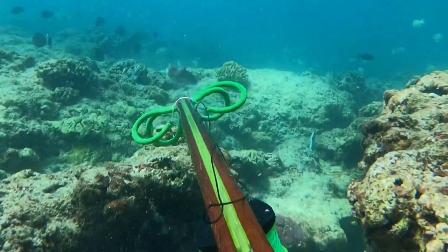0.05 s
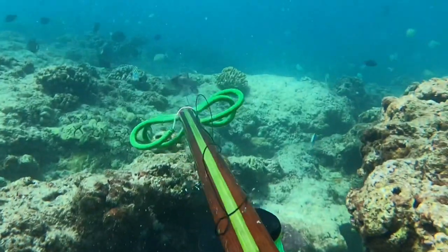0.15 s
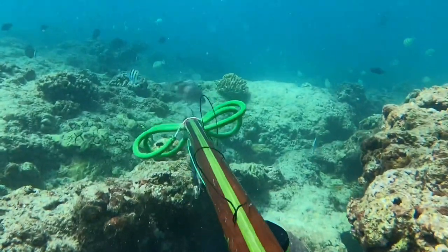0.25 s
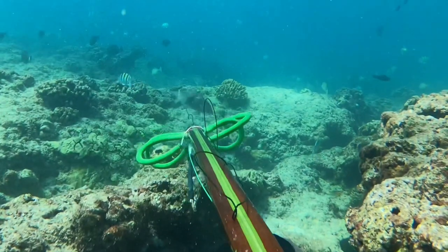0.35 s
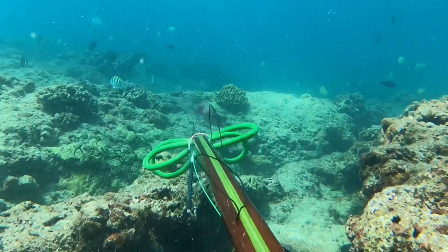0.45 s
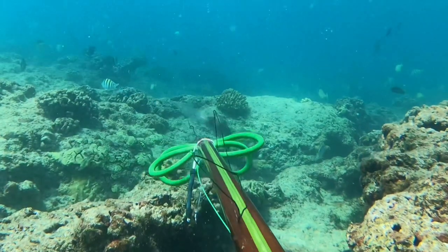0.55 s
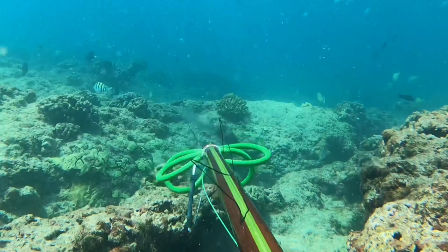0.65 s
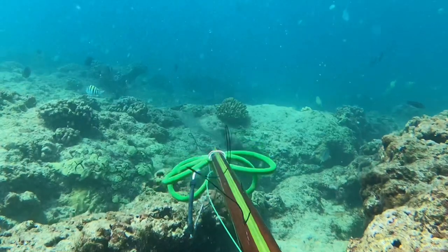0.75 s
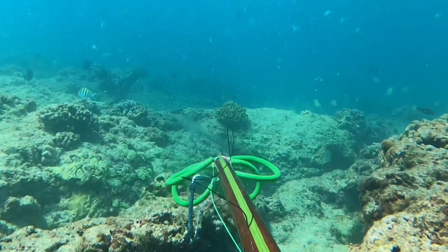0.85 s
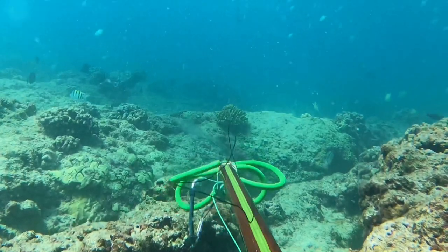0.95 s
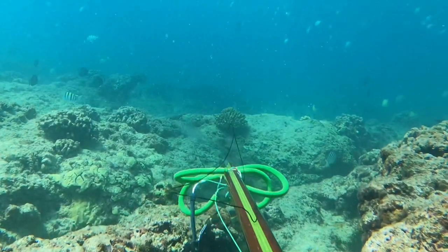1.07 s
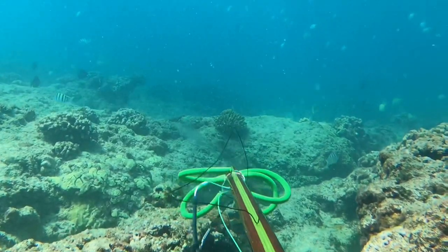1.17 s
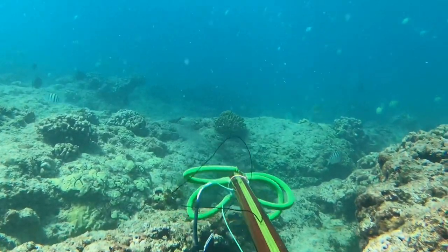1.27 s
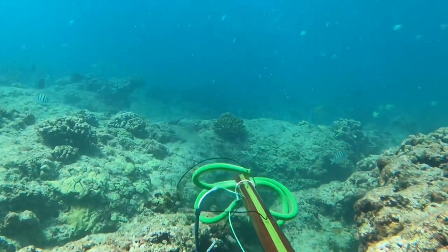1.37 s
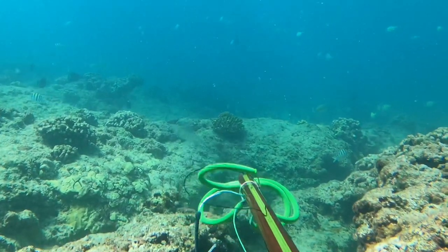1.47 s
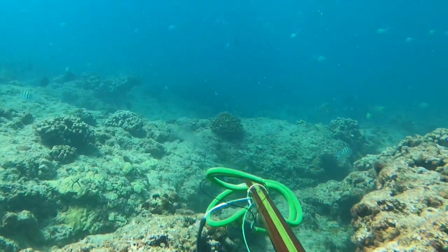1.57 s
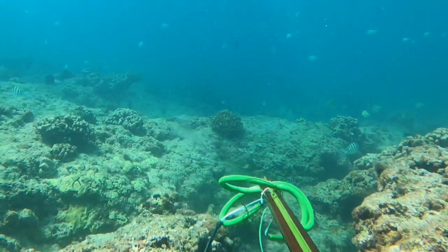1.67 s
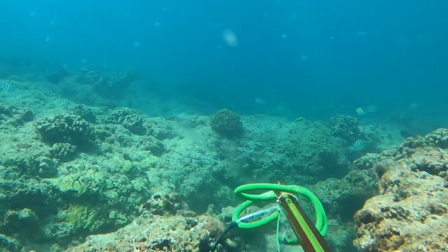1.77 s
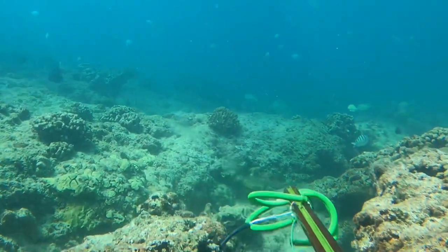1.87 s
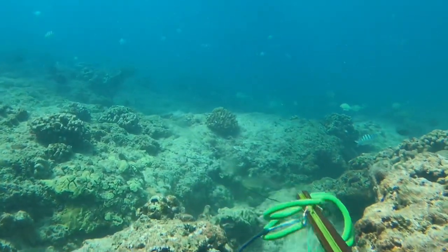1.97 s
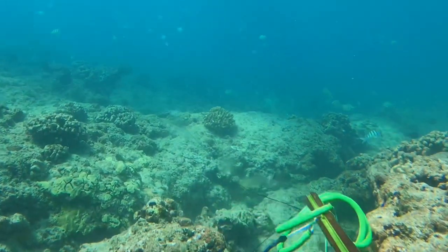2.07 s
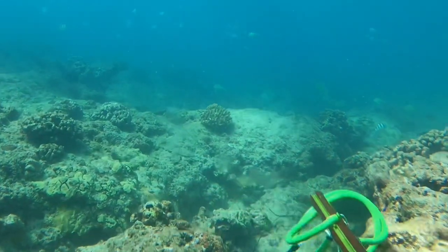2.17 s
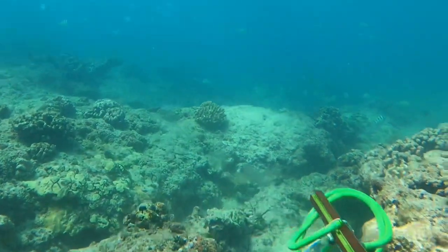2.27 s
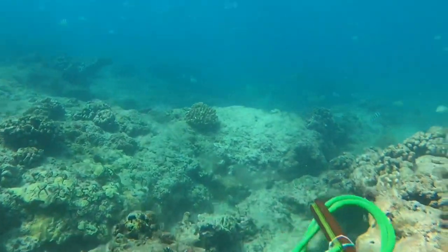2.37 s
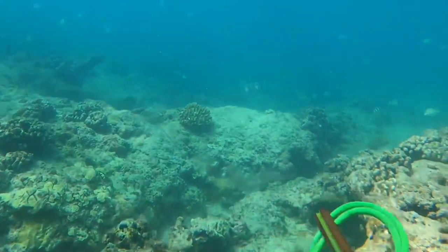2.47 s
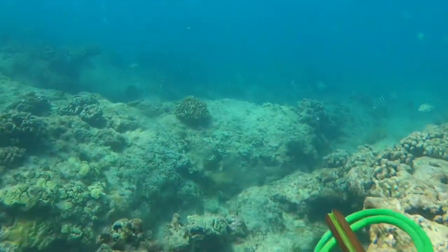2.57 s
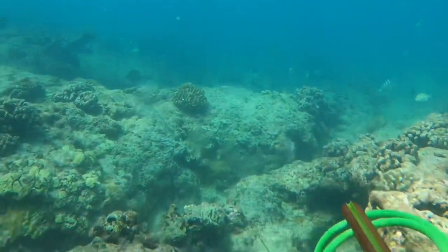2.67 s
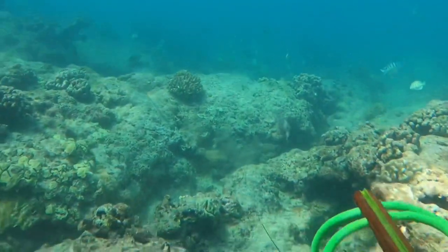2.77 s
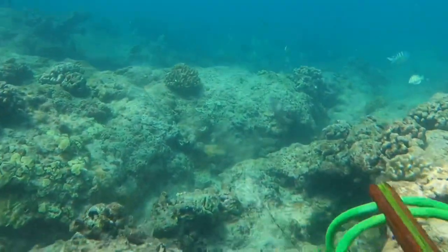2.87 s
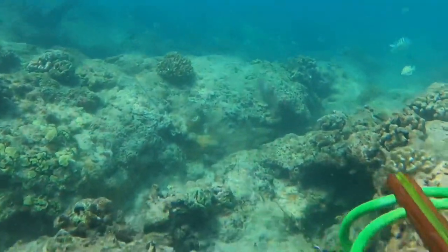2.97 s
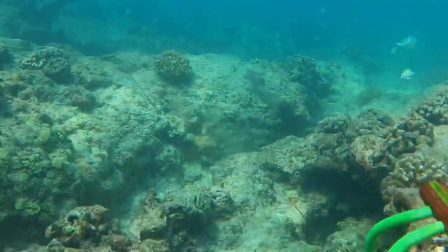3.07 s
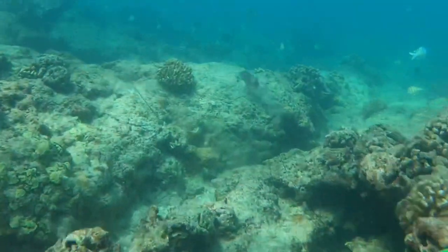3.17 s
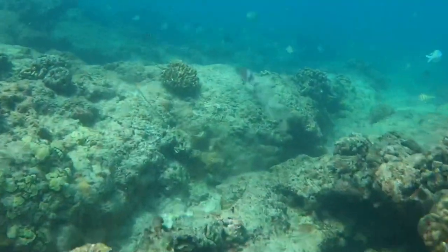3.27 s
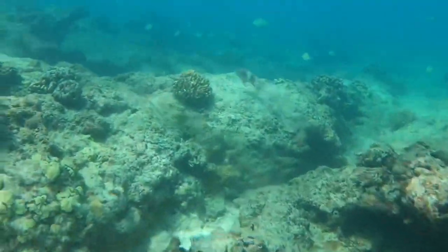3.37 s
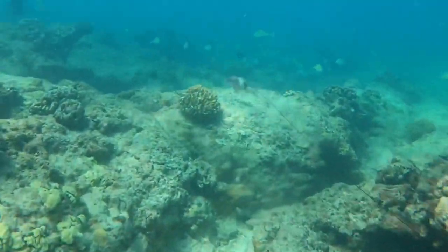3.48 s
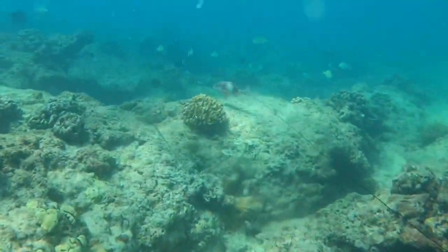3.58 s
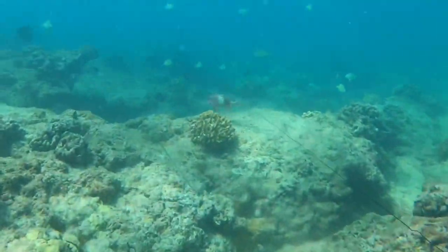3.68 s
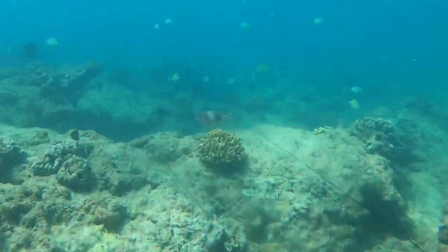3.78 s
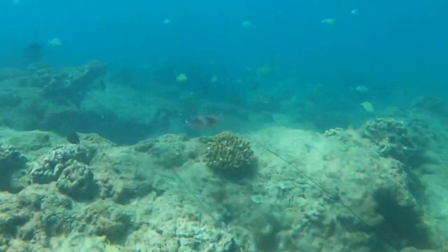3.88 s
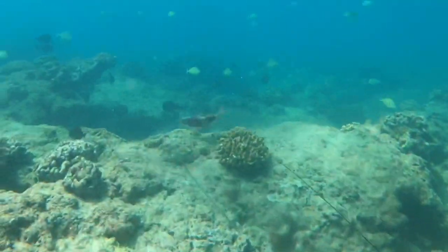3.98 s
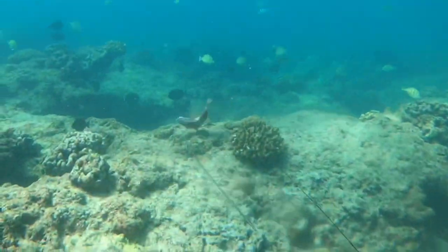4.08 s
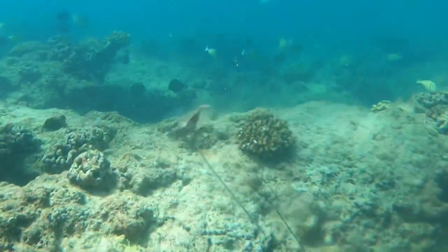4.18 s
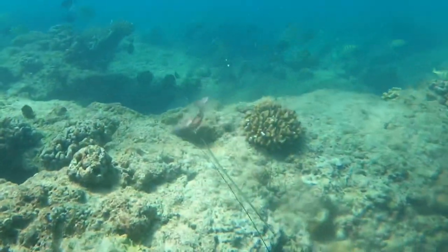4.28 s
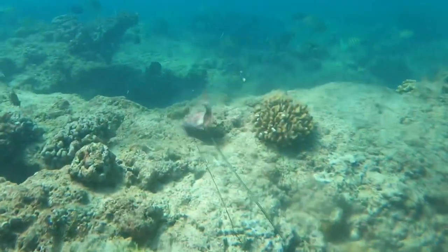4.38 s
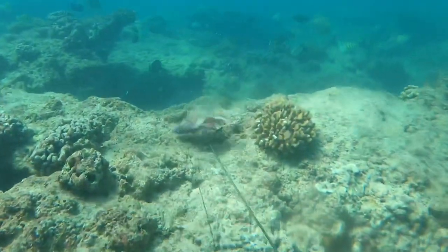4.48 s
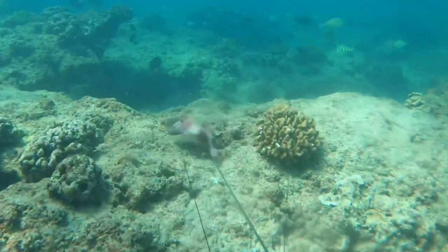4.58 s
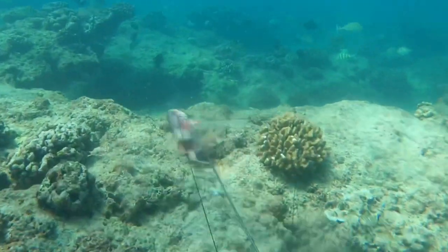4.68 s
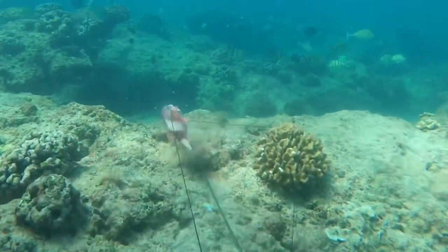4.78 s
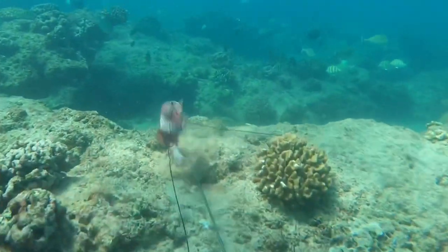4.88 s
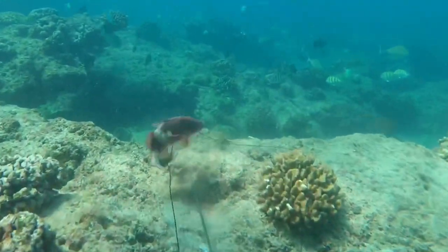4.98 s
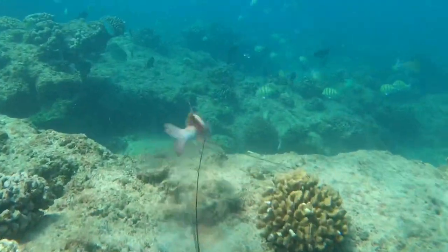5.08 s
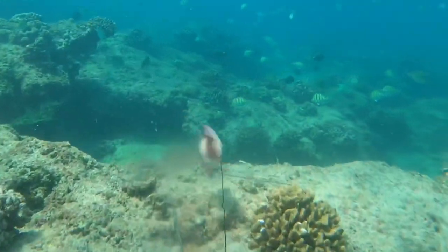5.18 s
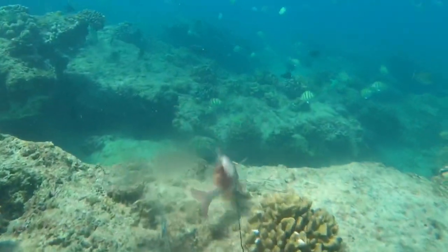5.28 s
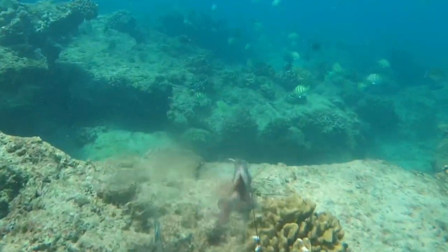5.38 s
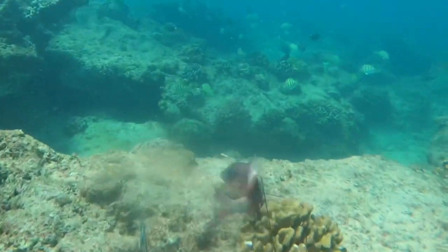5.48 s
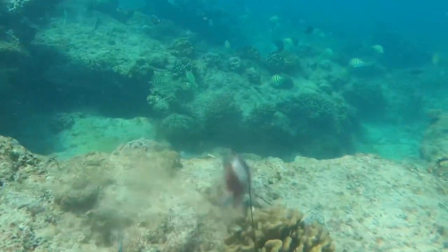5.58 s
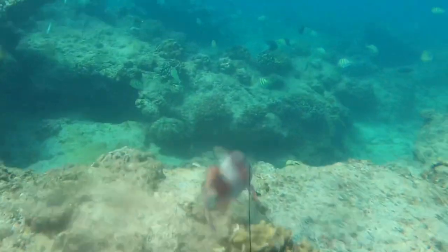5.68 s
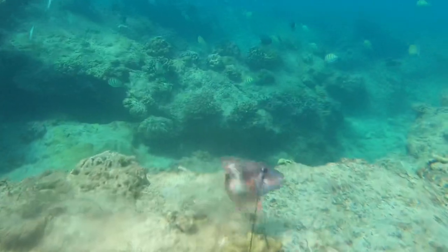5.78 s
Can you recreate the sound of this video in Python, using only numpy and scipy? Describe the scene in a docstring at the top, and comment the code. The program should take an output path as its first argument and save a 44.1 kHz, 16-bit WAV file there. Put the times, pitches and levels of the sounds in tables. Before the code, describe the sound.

A speargun fires underwater with a sharp woody crack and rattling line, then muffled water churns with knocks, gear clacks and faint reef crackle.

```python
"""Speargun shot over a reef

A speargun cracks, its rubbers thrash and its line runs out along the ringing barrel. We listen from a
camera in a waterproof housing. Then the diver swims on: water churns, gear clacks, scrapes and rings.
Blows and rubbing excite resonances; water and the crackle of reef shrimp are shaped random noise;
knocks, gurgles and the wavering rings of the last rustle are short tones."""
import sys
import numpy as np
from scipy import signal
from scipy.fft import rfft, irfft
from scipy.io import wavfile
from scipy.ndimage import uniform_filter1d, map_coordinates

SR = 44100
rng = np.random.default_rng(int(sys.argv[2]) if len(sys.argv) > 2 else 0)


def master(y):
    """Save y as 16-bit WAV."""
    cut = np.clip(np.atleast_2d(y).T, -1, 1)
    pcm = np.round(cut * 32767)  # scale
    wavfile.write(sys.argv[1], SR, pcm.astype(np.int16))


N = 257544  # length in samples
T = np.arange(N) / SR  # time of every sample [s]


def amp(db):
    """Turns decibels into a gain."""
    return 10 ** (np.asarray(db) / 20)


def evened(x):
    """Brings a sound to unit average power."""
    return x / np.sqrt(np.mean(x ** 2) + 1e-20)


def steadied(x, seconds):
    """Holds a noise at unit power over stretches of the given length."""
    power = uniform_filter1d((x ** 2).mean(0), int(seconds * SR) + 1)
    return x / np.sqrt(abs(power) + 1e-12)


def curve(rows, axis=1):
    """Draws straight lines between the points of a table whose first column is time."""
    rows = np.asarray(rows)
    return np.interp(T, rows[:, 0], rows[:, axis])


def add(mix, start_s, sound):
    """Mixes in a short sound from its start time, cut off at the end of the scene."""
    part = mix[:, max(0, round(start_s * SR)):][:, :sound.shape[-1]]
    part += sound[..., :part.shape[1]]


def colour(x, points, size=4096):
    """Filters without looking ahead to give a spectrum, so that clicks keep their sharp fronts."""
    points_hz, points_db = np.transpose(points)
    bins_hz = abs(np.fft.fftfreq(size, 1 / SR))
    db = np.interp(np.log(bins_hz + 1), np.log(points_hz), points_db)
    # the phase that belongs to this gain puts the energy as early as possible
    spectrum = np.exp(np.conj(signal.hilbert(np.log(amp(db)))))
    taps = np.fft.ifft(spectrum).real[:size // 2]
    return signal.oaconvolve(x, taps[None], axes=1)[:, :x.shape[1]]


def resonate(x, hz, width_hz):
    """Passes a sound through one resonance, with gain 1 at its pitch."""
    return signal.lfilter(*signal.iirpeak(hz, hz / width_hz, SR), x)


def ports(pair, left_db, same):
    """Two microphones share part of the sound (same: 0 none, 1 all); the left one hears more."""
    right = same * pair[0] + np.sqrt(1 - same ** 2) * pair[1]
    return np.array([pair[0], right]) * amp([[left_db / 2], [-left_db / 2]])


def wander(hz):
    """Slow random drift of unit size, with little movement faster than the given rate."""
    keep = np.exp(-(np.fft.rfftfreq(N, 1 / SR) / hz) ** 2)
    return evened(irfft(rfft(rng.standard_normal(N)) * keep, N))


def grains(per_s, spread_db):
    """Random clicks of uneven size, arriving unequally at the two ports."""
    size = amp(spread_db * np.minimum(rng.exponential(1, N), 4))
    happens = rng.random(N) < per_s / SR
    return evened(rng.standard_normal((2, N)) * size * happens)


def burst(hz, decay, breadth, size=4096):
    """A blow: dying noise round one pitch, with the energy of 5 ms at unit power."""
    # decay is in seconds; breadth is the width as a share of the pitch
    kick = rng.standard_normal((2, size)) * np.exp(-np.arange(size) / SR / decay)
    ring = resonate(resonate(kick, hz, hz * breadth), hz, hz * breadth)
    return ring / np.sqrt((ring ** 2).sum(1, keepdims=True) / (.005 * SR))


def ringing(modes, centre_hz, octaves, size=16384):
    """A blow wakes the modes near its centre pitch most; each port meets them in its own phase."""
    t = np.arange(size) / SR
    hz, db, decay = np.transpose(modes)[:, :, None]
    weight = amp(db) * np.exp(-.5 * (np.log2(hz / centre_hz) / octaves) ** 2)
    fading = weight * np.exp(-t / decay)
    phase = 2 * np.pi * rng.random(hz.shape)
    lag = np.pi / 2 * rng.choice([-1, 1], hz.shape)
    pair = [(fading * np.sin(2 * np.pi * hz * t + p)).sum(0) for p in (phase, phase + lag)]
    return np.array(pair) * (1 - np.exp(-(t / 0.00037) ** 2))  # softens the first instant


def swells(rows):
    """Gain of a set of surges, each growing exponentially to its peak and dying away ever faster."""
    gain = 0
    for peak_s, db, rise, fall in rows:
        before = (peak_s - T) / rise
        after = (np.maximum(T - peak_s, 0) / fall) ** 1.36
        gain = gain + amp(db) * np.exp(-np.maximum(before, after))
    return gain


# the shaft leaves, then the line slaps the gun:
# (time [s], level [dB], centre pitch [Hz], decay [s])
CRACKS = [(0.0635, -12, 780, 0.0047), (0.071, -13, 1760, 0.016), (0.316, -42.5, 1200, .006),
          (0.335, -38, 1010, 0.013), (0.485, -53.5, 1110, 0.0028), (0.527, -55.5, 1700, .004),
          (0.58, -49, 1250, .006), (0.604, -42, 1200, .006), (0.62, -33, 640, 0.018),
          (0.661, -53, 1000, .008), (0.716, -49.5, 1000, .006), (0.829, -50.5, 1270, 0.0048),
          (0.932, -53, 1200, .005), (0.992, -54.5, 900, .005), (1.287, -55.5, 1156, .006)]
# what the gun rings with: (pitch [Hz], width [Hz], level [dB])
BARREL_MODES = [(519, 35, -3), (696, 73, -15.5), (827, 50, -7), (1125, 66, -13), (1252, 52, -6),
                (1415, 70, -1), (1608, 26, -8), (1760, 75, -8.5), (1950, 100, -7.5), (2210, 170, -11.5),
                (3040, 130, -8.5)]
# broad colour of the rubbing: (frequency [Hz], level [dB])
RUB_COLOUR = [(150, 6.5), (300, 1.5), (600, -3.5), (1000, 1.5), (1400, -10), (1900, -13.5), (2600, -19.5),
              (4000, -30.5), (8000, -34), (13500, -16), (16000, -51.5)]
# rubbing surges: a brief scuff at the very start, then the line whipping along the gun:
# (time of peak [s], level [dB], rise [s], fall [s])
RUB_SURGES = [(0.003, -31, 0.011, 0.003), (0.04, -49.5, 0.023, .02), (0.076, -27.5, 0.0093, 0.079),
              (0.339, -40.5, 0.027, 0.029), (0.625, -39.5, 0.029, 0.043)]
# under the surges the line runs out ever more faintly
LINE_RUN_DB, LINE_FADE_DB_PER_S = -62.5, 9
# the rubbing wakes each mode on its own: scatter of its level, and how fast that changes
RATTLE_DB, RATTLE_HZ = 3.5, 30


def shot():
    """Cracks and slaps strike the barrel, and rubbing and rattling keep it ringing."""
    pull = swells(RUB_SURGES) + amp(LINE_RUN_DB - LINE_FADE_DB_PER_S * T)
    rub = evened(colour(grains(per_s=3000, spread_db=1), RUB_COLOUR)) * pull
    rings = np.zeros((2, N))
    for hz, width, db in BARREL_MODES:
        rattle = amp(RATTLE_DB * wander(hz=RATTLE_HZ))
        rings += amp(db) * resonate(rub * rattle, hz, width)
    out = amp(-15) * rub + amp(11) * rings
    # a narrow resonance rings for longer
    modes = [(hz, db, 1 / (np.pi * width)) for hz, width, db in BARREL_MODES]
    for s, db, hz, decay in CRACKS:
        body = amp(-10.0) * burst(hz, decay, breadth=0.46)
        edge = amp(-35.5) * burst(11025, decay, breadth=5920 / 11025)
        add(out, s, amp(db) * (body + edge))
        add(out, s, amp(db) * ringing(modes, hz, octaves=0.89))
    return ports(out, left_db=4.0, same=0.026)


# the gun and its slack rubbers swing: (start [s], length [s], pitch [Hz], level [dB])
RECOIL_SWINGS = [(0.01, 0.19, 22.9, -11.5), (0.064, 0.14, 48, -9.5), (0.0785, 0.092, 115.1, -6.5),
                 (0.1, 0.075, 239.7, -29.5)]


def recoil():
    """Swings of the gun push the water: brief, mostly deep tones that swell and fade."""
    out = np.zeros((2, N))
    for s, length, hz, db in RECOIL_SWINGS:
        t = np.arange(0, length, 1 / SR)
        add(out, s, amp(db) * np.sin(np.pi * t / length) * np.sin(2 * np.pi * hz * t))
    return out


def gurgles(count=150):
    """Pockets of churned water swell, glide upward and die within a few cycles."""
    out, t = np.zeros((2, N)), np.arange(SR // 8) / SR
    for when, pitch, size, start in rng.random((count, 4)):
        hz = 115 * 2.9 ** pitch
        age = t * hz / 2  # 1 at the loudest moment
        tone = np.sin(2 * np.pi * (hz * t * (1 + 0.039 * age) + start))
        blob = (age * np.exp(1 - age)) ** 2 * tone
        add(out, when * N / SR, amp(-16 * size - 11 * pitch) * blob)
    return evened(out) * amp([[.6], [-.6]])


# water moving past the housing: (time [s], slow surge level [dB], eddy level [dB])
FLOW = [(0, -18.5, -25.5), (.4, -30, -47.5), (.8, -28, -51), (1.22, -39, -66), (1.5, -32.5, -46),
        (2.35, -34, -45), (2.6, -25.5, -39), (3.0, -22, -29), (3.2, -23, -39), (3.38, -18.5, -27),
        (3.85, -24, -30), (4.1, -20, -24), (4.38, -18, -28), (4.48, -24.5, -35), (4.75, -20, -30),
        (5.78, -19.5, -27)]
# colour of the slow pressure surges: (frequency [Hz], level [dB])
SURGE_COLOUR = [(8, -9), (22, -3), (42, 1.5), (60, -11.5), (85, -14), (120, -30.5), (500, -93)]
# colour of the eddies at low speed: (frequency [Hz], level [dB])
SLOW_EDDIES = [(40, -9.5), (80, -5.5), (115, 0.5), (170, -9.5), (260, -23.5), (400, -40), (800, -64.5),
               (3000, -84.5)]
# colour of the eddies at full speed: (frequency [Hz], level [dB])
FAST_EDDIES = [(40, -11.5), (85, -5.5), (125, -1), (200, -8.5), (310, -10.5), (440, -27.5), (700, -45),
               (1200, -64), (3000, -56.5), (8000, -90)]
# the diver gets under way: (time [s], swimming speed [0 to 1])
SPEED = [(0, 0.24), (1.3, 0.02), (2.1, 0.04), (2.9, 0.61), (4, 0.55), (5.84, 0.97)]
# eddies shed by the shot, the line and the diver's strokes: (time of peak [s], level [dB], width [s])
GUSTS = [(0.122, -16.5, 0.042), (0.251, -29, 0.025), (0.639, -35, 0.042), (1.721, -36, 0.06),
         (2.022, -32, 0.06), (3.451, -24.5, 0.03), (4.05, -25, 0.058), (4.84, -27.5, 0.12)]


def water():
    """Pressure surges and lumpy eddies, which change colour and gurgle as the diver speeds up."""
    noise = colour(rng.standard_normal((1, N)), SURGE_COLOUR, size=16384)
    surge = steadied(noise, seconds=0.071) * amp([[.2], [-.2]])
    lumps = amp(2.9 * wander(hz=22.0))
    swirl = ports(grains(per_s=700, spread_db=-1.0) * lumps, left_db=0.42, same=1.0)
    speed = curve(SPEED)
    churn = .82 * evened(colour(swirl, FAST_EDDIES)) + .57 * gurgles()
    eddies = (1 - speed) * evened(colour(swirl, SLOW_EDDIES)) + speed * churn
    gusts = sum(amp(db) * np.exp(-.5 * ((T - s) / width) ** 2) for s, db, width in GUSTS)
    eddy_gain = np.hypot(amp(curve(FLOW, axis=2)), gusts) * amp(-1.48)
    return surge * amp(curve(FLOW, axis=1) - 2.0) + steadied(eddies, seconds=.16) * eddy_gain


# colour of the fine turbulence: (frequency [Hz], level [dB])
SWISH_COLOUR = [(200, -14), (450, 2), (700, -6.5), (950, -8), (1250, -13.5), (1600, -14.5), (2000, -31),
                (4000, -34.5), (9000, -54)]
# brief hissing rushes of water: (time of peak [s], level [dB], rise [s], fall [s])
RUSHES = [(3.106, -37.5, 0.0029, 0.0031), (3.544, -35, 0.016, 0.011), (5.644, -45, 0.004, 0.015),
          (5.785, -42.5, 0.056, 0.011)]
# fine turbulence grows faster than the eddies: its level when they are at CRUISE_DB, and dB per dB
CRUISE_DB, SWISH_DB, SWISH_GROWTH = -30, -60, 1.44


def swish():
    """Fine, fluttering turbulence that follows the eddies of the flow, and a few brief rushes."""
    fizz = evened(colour(grains(per_s=6000, spread_db=1.5), SWISH_COLOUR))
    steady = amp(SWISH_DB + SWISH_GROWTH * (curve(FLOW, axis=2) - CRUISE_DB))
    flutter = amp(2.9 * wander(hz=35))
    return ports(fizz * (steady + swells(RUSHES)) * flutter, left_db=1.0, same=0.68)


# dull knocks and gulps of water at the housing: (start [s], level [dB], pitch [Hz])
KNOCKS = [(0.0615, -17.5, 251), (0.337, -33, 263), (0.616, -35.5, 295.8), (1.984, -22, 122.3),
          (2.179, -36, 313), (2.787, -29, 246), (3.1025, -37.5, 699), (2.913, -15.5, 164),
          (3.029, -18, 162), (3.107, -14, 149.3), (3.106, -18.5, 333), (3.5425, -36, 1120),
          (3.836, -24, 299), (3.979, -19.5, 181), (4.049, -12.5, 163), (5.635, -18, 297),
          (5.7479, -13.5, 311.4), (5.781, -20, 344), (5.797, -12.5, 353)]
KNOCK_CYCLES = 1.33  # cycles from the start of a knock to its peak


def knocks():
    """Each is a tone that swells for a cycle or so and dies away."""
    out, t = np.zeros((2, N)), np.arange(SR // 4) / SR
    for s, db, hz in KNOCKS:
        age = t * hz / KNOCK_CYCLES
        add(out, s, amp(db) * (age * np.exp(1 - age)) ** 2 * np.sin(2 * np.pi * hz * t))
    return out * amp([[.7], [-.7]])


# hard gear clacks near the camera: (time [s], level [dB], centre pitch [Hz], spread [octaves])
CLACKS = [(3.5424, -1, 2830, 0.15), (3.5429, -14.5, 1280, 0.93), (3.548, -18, 2620, 0.65),
          (3.555, -16, 2560, 0.49), (3.5634, -15, 4920, 0.47), (3.5645, -17.5, 2970, 0.31),
          (3.654, -17.5, 3747, 0.13), (3.6665, -18.5, 4400, 0.2), (3.676, -19.5, 3720, 0.14),
          (4.331, -10, 1780, 0.98), (4.341, -11.5, 1503, 0.55), (4.3423, -15, 3560, 0.4)]
# what the gear rings with: (pitch [Hz], level [dB], decay [s])
GEAR_MODES = [(1045, -16.5, 0.0043), (1208.6, -5, 0.0035), (1372, -3.5, 0.004), (1813, -2.5, 0.0016),
              (2340, 2, 0.00078), (2740, -14, 0.0019), (3070, -6.5, 0.0019), (3170, -10.5, 0.0029),
              (3840, -3.5, 0.00087), (4740, -11.5, 0.0018), (5780, -17.5, 0.0016)]
# a single tap on the housing: (time [s], level [dB])
HOUSING_TAP = (3.5431, -19)


def clacks():
    """Hard contacts, damped within milliseconds by the water, each with a little chatter."""
    out = np.zeros((2, N))
    for s, db, hz, octaves in CLACKS:
        add(out, s, amp(db) * ringing(GEAR_MODES, hz, octaves))
        add(out, s, amp(db - 23) * burst(hz, decay=0.004, breadth=0.18))
    s, db = HOUSING_TAP
    add(out, s, amp(db) * np.exp(-np.arange(40) / SR / .00008))
    return out * amp([[1.2], [-1.2]])


# colour of the scraping: (frequency [Hz], level [dB])
SCRAPE_COLOUR = [(200, 5), (400, 20), (650, -2), (1000, -12), (1300, -9.5), (1640, 8.5), (2100, -19),
                 (2500, -2.5), (2900, -12), (3900, -3.5), (5000, -16.5), (8000, -28), (15000, -37)]
# something drags over the housing in short slips: (start [s], length [s], level [dB])
SLIPS = [(2.883, 0.019, -38.5), (2.902, 0.0065, -32), (2.915, 0.016, -39.5), (2.934, 0.0062, -32),
         (2.9435, 0.006, -26.5), (5.638, 0.009, -34), (5.674, 0.01, -42), (5.762, 0.029, -41)]
SLIP_ATTACK_S, SLIP_RELEASE_S = 0.0012, 0.0035
# the dragged gear catches and knocks on the housing: (time [s], level [dB], centre pitch [Hz])
BUMPS = [(2.888, -36, 680), (2.9061, -19.5, 700), (2.937, -21.5, 646), (2.9442, -22, 1150),
         (2.951, -28, 1670), (5.641, -45, 950)]
# what the housing's shell rings with: (pitch [Hz], level [dB], decay [s])
SHELL_MODES = [(391, -3, 0.0074), (628, -6, 0.0076), (700.8, -14, 0.0074), (1620, -6, 0.0035),
               (1870, -8.5, 0.0031), (2440, -3, 0.0043)]


def scrape():
    """Stick and slip: each slip starts fast, holds and lets go; each catch rings the shell."""
    grit = evened(colour(grains(per_s=2500, spread_db=0), SCRAPE_COLOUR))
    force = np.zeros(N)
    for s, length, db in SLIPS:
        t = np.maximum(T - s, 0)
        attack = 1 - np.exp(-t / SLIP_ATTACK_S)
        release = np.exp(-np.maximum(t - length, 0) / SLIP_RELEASE_S)
        force += amp(db) * attack * release
    out = grit * force
    for s, db, hz in BUMPS:
        add(out, s, amp(db) * ringing(SHELL_MODES, hz, octaves=0.92))
    return ports(out, left_db=3.5, same=0.82)


# short wavering rings within the last rustle:
# (start [s], length [s], level [dB], start pitch [Hz], end pitch [Hz])
SHORT_RINGS = [(5.636, 0.019, -44.5, 2820, 2692), (5.758, 0.018, -48, 2430, 2520),
               (5.778, 0.013, -38.5, 1617, 1570)]
RING_WAVER, RING_FLUTTER_DB = 0.021, 7  # share of the pitch, scatter of the level


def short_rings():
    """Thin, wavering tones that swell and fade."""
    out = np.zeros((2, N))
    waver = 1 + RING_WAVER * wander(hz=40.2)
    flutter = amp(RING_FLUTTER_DB * wander(hz=29.7))
    for s, length, db, start_hz, end_hz in SHORT_RINGS:
        along = np.clip((T - s) / length, 0, 1)  # 0 at the start, 1 at the end
        hz = (start_hz + (end_hz - start_hz) * along) * waver
        swell = np.sqrt(4 * along * (1 - along))
        out += amp(db) * swell * flutter * np.sin(2 * np.pi * np.cumsum(hz) / SR)
    return out * amp([[2], [-2]])


def snap(hz):
    """A near shrimp: a sharp front and a short rattle."""
    return burst(hz, decay=.0005, breadth=1) + .6 * burst(hz, decay=.005, breadth=1)


REEF_ECHO_S, REEF_ECHO_DB = 0.008, 2.5  # decay and level of the coral's echoes


def scattered(x, size=2048):
    """The coral scatters each click into brief, dying echoes."""
    echoes = rng.standard_normal((2, size)) * np.exp(-np.arange(size) / SR / REEF_ECHO_S)
    echoes /= np.linalg.norm(echoes, axis=1, keepdims=True)
    return x + amp(REEF_ECHO_DB) * signal.oaconvolve(x, echoes, axes=1)[:, :N]


CRACKLE_EDGE_HZ = 10260  # upper edge of the crackle at full pace


def paced(x, clock):
    """Rounds off the treble, then plays the sound at the clock's pace: slower is also lower."""
    dull = irfft(rfft(x) / (1 + (np.fft.rfftfreq(N, 1 / SR) / CRACKLE_EDGE_HZ) ** 10), N)
    return np.array([map_coordinates(port, [clock], order=3) for port in dull])


# the reef's sharpest snaps and ticks: (time [s], level [dB])
SNAPS = [(1.607, -52.5), (1.63, -59), (1.665, -61), (1.814, -55.5), (1.842, -53.5), (1.869, -57.5),
         (2.317, -62), (2.329, -57), (2.466, -58), (2.576, -53.5), (2.676, -53), (2.814, -52.5),
         (2.855, -49.5), (2.874, -49), (2.9876, -51.5), (3.1752, -53), (3.319, -53), (3.3372, -50.5),
         (3.367, -52), (3.419, -48.5), (3.585, -54), (3.7224, -47), (3.7761, -48.5), (3.954, -51.5),
         (4.1008, -48), (4.3809, -45.5), (4.404, -46.5), (4.512, -52), (4.6135, -46), (4.679, -61),
         (4.76, -57.5), (4.8687, -57), (4.908, -49.5), (5.01, -46), (5.11, -44.5), (5.168, -60),
         (5.253, -48.5), (5.47, -56), (5.496, -54), (5.562, -49.5), (5.67, -49), (5.722, -52)]
SNAP_HZ = 3780  # centre pitch of a snap at full pace, before the housing
# level of the dense crackle: very faint at first, rising quickly near 1.6 s, then slowly:
# (time [s], level [dB])
REEF = [(0, -79.5), (1.56, -68), (1.65, -64.5), (2.28, -65.5), (2.36, -63), (3.4, -59), (5.84, -57.5)]
# the housing colours what comes through it: (frequency [Hz], level [dB])
HOUSING_COLOUR = [(400, -1.5), (1250, -12), (1430, 1), (1620, 9.5), (1900, -10), (2130, -7), (2420, 5),
                  (2750, 0), (4200, 2), (4620, -3), (4900, 2), (5300, -7), (5700, -3.5), (7000, -5),
                  (8400, -13.5), (15000, -17.5)]
# the crackle starts slow and dull, then brightens: (time [s], pace and pitch [share of full])
BRIGHTNESS = [(1.2, 0.36), (1.58, 0.45), (1.63, 0.62), (1.93, 0.63), (1.99, 0.83), (2.28, 0.86),
              (2.35, 0.99), (2.8, 0.99)]


def crackle():
    """Many far shrimp and single near snaps, heard through the housing, rising in pitch at first."""
    clock = np.cumsum(curve(BRIGHTNESS))
    clicks = grains(per_s=480, spread_db=3.4) + .45 * rng.standard_normal((2, N))
    far = evened(colour(scattered(clicks), HOUSING_COLOUR))
    near = np.zeros((2, N))
    for s, db in SNAPS:
        # placed by the clock so that it is heard at its listed time
        add(near, np.interp(s, T, clock) / SR, amp(db) * snap(SNAP_HZ))
    near = colour(near, HOUSING_COLOUR)
    level = amp(curve(REEF) + 1.2 * wander(hz=18))
    return ports(paced(far, clock) * level + paced(near, clock), left_db=4.0, same=0.056)


def hiss():
    """The microphones' faint, even noise."""
    return amp(-87.5) * rng.standard_normal((2, N))


def scene():
    """Shot, moving water, gear and reef over the faint hiss."""
    gun = shot() + recoil()
    flow = water() + swish() + knocks()
    gear = clacks() + scrape() + short_rings()
    return gun + flow + gear + crackle() + hiss()


def record(dry):
    """The camera's band limit: a steep low-pass at 15.7 kHz."""
    taps = signal.firwin(511, 15700, window=("kaiser", 9), fs=SR)
    return signal.oaconvolve(dry, taps[None], "same")


dry = scene()
out = record(dry)
master(out)
```